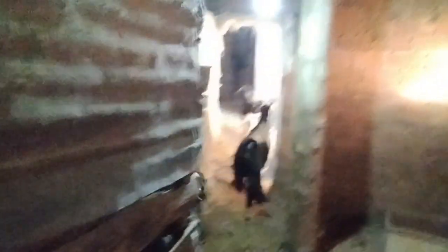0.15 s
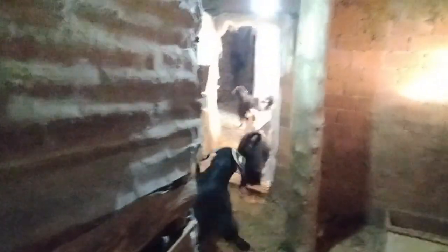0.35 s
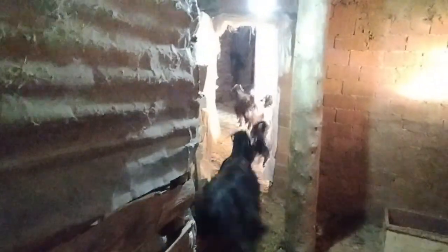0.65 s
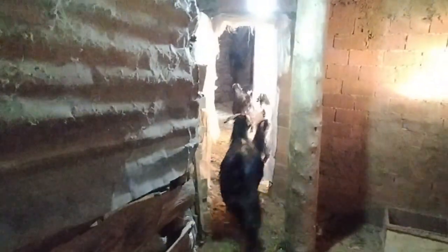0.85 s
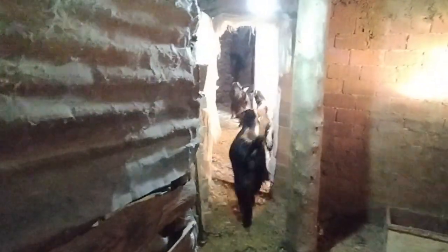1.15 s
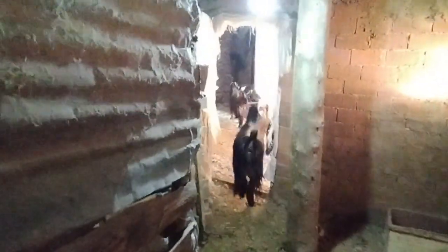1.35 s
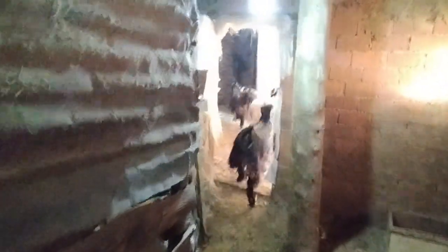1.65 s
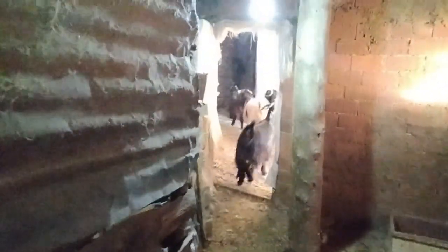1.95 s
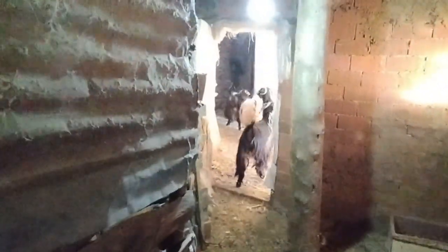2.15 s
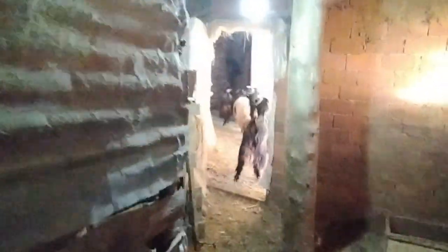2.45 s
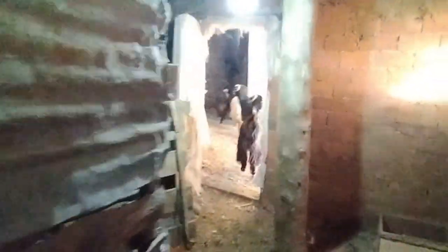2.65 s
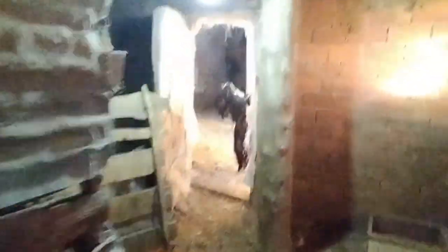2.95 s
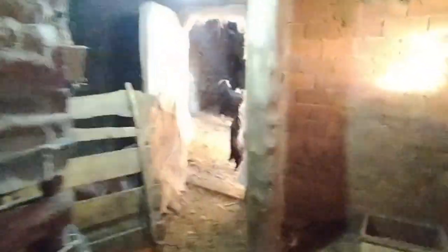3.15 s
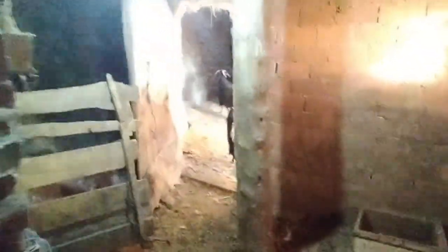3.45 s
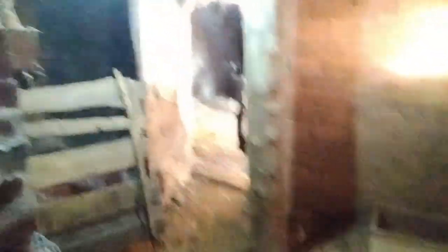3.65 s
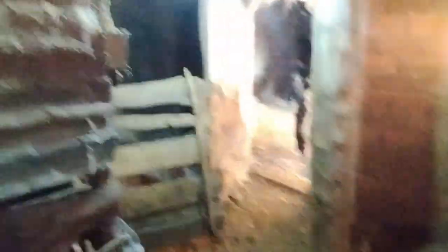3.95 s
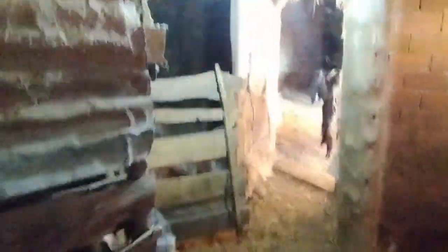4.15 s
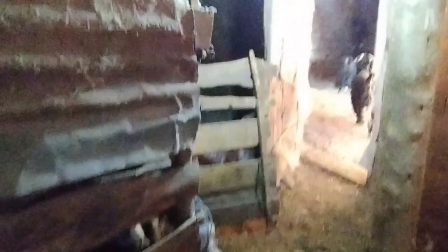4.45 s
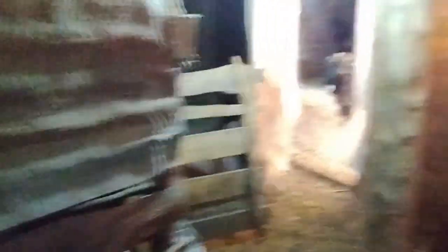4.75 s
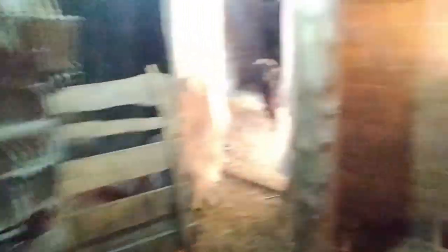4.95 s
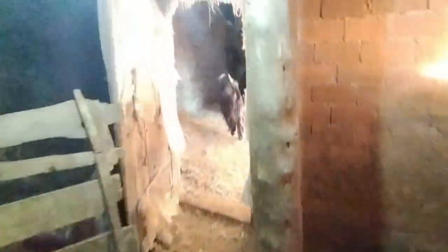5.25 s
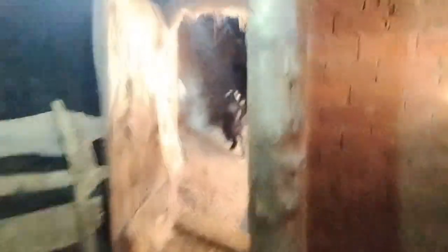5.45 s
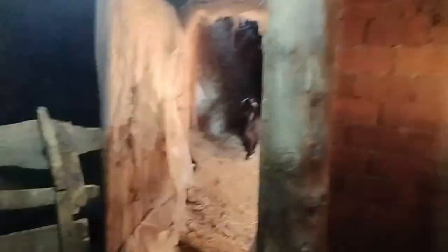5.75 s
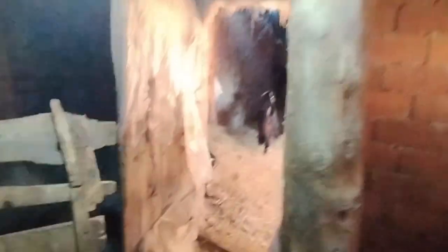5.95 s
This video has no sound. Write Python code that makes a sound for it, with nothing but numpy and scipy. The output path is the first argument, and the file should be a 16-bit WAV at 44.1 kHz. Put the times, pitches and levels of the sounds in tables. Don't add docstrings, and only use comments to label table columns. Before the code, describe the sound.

Loud tinny sheet-metal rattle with a boomy shove, a softer second bump, then sparse dull hoof and shoe thuds on straw in a quiet barn.

```python
import sys
import numpy as np
from scipy import signal
from scipy.fft import rfft, irfft, next_fast_len
from scipy.io import wavfile
from scipy.ndimage import uniform_filter1d, map_coordinates

SR = 44100
rng = np.random.default_rng(int(sys.argv[2]) if len(sys.argv) > 2 else 0)


def materialize(psi):
    bounded = np.clip(np.atleast_2d(psi).T, -1, 1)
    quanta = np.round(bounded * 32767).astype(np.int16)
    wavfile.write(sys.argv[1], SR, quanta)


def makeup_ratio(level_db):
    decades = np.asarray(level_db, float) / 20
    return 10 ** decades


N = 269451

# frequency in Hz, density in dB per Hz.
STRAW = [(290, -0.5), (500, -8.5), (688, -5), (1130, -11.5), (1440, -10.5), (1720, -13.5), (2070, -11.5),
         (6510, -14), (8580, -26), (9920, -41.5), (12000, -44), (13300, -69), (16000, -34)]


def evened(x):
    return x / np.sqrt(np.mean(x ** 2) + 1e-20)


def curve(rows):
    s, *columns = np.transpose(rows)
    return [np.interp(np.arange(N) / SR, s, c) for c in columns]


def read(points, hz):
    f, value = np.transpose(points)
    return np.interp(np.log(hz + 1), np.log(f + 1), value)


def colour(x, points):
    size = next_fast_len(x.shape[-1])
    gain = makeup_ratio(read(points, np.fft.rfftfreq(size, 1 / SR)))
    return irfft(rfft(x, size) * gain, size)[..., :x.shape[-1]]


def resonate(x, hz, width_hz):
    r = np.exp(-np.pi * width_hz / SR)
    turn = 2 * np.pi * hz / SR
    return signal.lfilter([1 - r], [1, -2 * r * np.cos(turn), r * r], x) * np.sin(turn) * 2


def grains(per_s, spread_db):
    u, e, sign = rng.random((3, N))
    size = makeup_ratio(spread_db * np.minimum(-np.log(e + 1e-9), 4))
    return evened((u < per_s / SR) * size * (sign - .5))


def blow(s, db, hold, t60, drive, rise):
    at = round(s * SR)
    piece = drive[at:at + round((hold + t60) * SR) + 1]
    t = np.arange(len(piece)) / SR
    fade = makeup_ratio(db - 60 * np.maximum(t - hold, 0) / t60)
    return at, piece, fade * (1 - np.exp(-t / rise))


def held(rows, share, *rest):
    return [(s, db, hz, share * t60, t60, *rest) for s, db, hz, t60 in rows]


def rings(rows, drive, raw_db, rise):
    out = np.zeros(N)
    for s, db, hz, hold, t60, width_hz in rows:
        at, piece, shape = blow(s, db, hold, t60, drive, rise)
        mode = resonate(resonate(piece, hz, width_hz), hz, 2 * width_hz)
        out[at:at + len(piece)] += shape * (evened(mode) + makeup_ratio(raw_db) * piece)
    return out


def air():
    # frequency in Hz, density in dB per Hz.
    air_bands = [(12, -9), (20, 5), (182, -26), (698, -20), (1030, -29), (1960, -20.5), (2910, -28.5),
                 (6010, -24), (8410, -29.5), (9670, -51), (11100, -44.5), (14300, -57), (16000, -35)]
    # frequency in Hz, left-right likeness from -1 to 1.
    likeness = [(60, 0.18), (240, 1), (950, 0.43), (3770, -0.22), (15000, 0.016)]
    # time in seconds, level in dB.
    stir_level = [(0.0, -21.5), (0.19, -32), (0.59, -43), (1.04, -53), (1.24, -71), (1.38, -49.5),
                  (1.6, -56.5), (2.13, -64.5), (3.47, -57.5), (3.81, -48), (3.91, -53), (5.82, -60),
                  (6.11, -57)]
    z = rfft(rng.standard_normal((2, N)))
    same = np.clip(read(likeness, np.fft.rfftfreq(N, 1 / SR)), -1, 1)
    hush = irfft([z[0], same * z[0] + np.sqrt(1 - same ** 2) * z[1]], N)

    stir = colour(np.array([grains(9800, 3.4), grains(9000, 3.2)]), STRAW)
    fits = evened(colour(rng.standard_normal(N), [(1, -85.0), (6, 8.0), (25, 6.0), (80, -46)]))
    stir = stir * makeup_ratio(1.84 * fits)
    return makeup_ratio(-61) * evened(colour(hush, air_bands)) + makeup_ratio(curve(stir_level)[0] - 4.0) * evened(stir)


def gate():
    # frequency in Hz, density in dB per Hz.
    rumble_bands = [(11, -25), (18, 11), (33, -2.5), (54, -3), (108, -7), (140, -8.5), (170, -33.5),
                    (220, -82), (370, -120)]
    # start in seconds, level in dB, t60 in seconds.
    jolts = [
        (0, -21, 0.81),
        (.06, -19.5, 2.9),
        (1.31, -24, 1.8),
        (3.6, -50, 1.3),
        (3.92, -50, 0.81),
        (4.42, -66, 1.2),
        (5.34, -46.5, 1),
        (6.05, -59, .5),
    ]
    # frequency in Hz, level in dB, width in Hz, t60 in seconds.
    sheet_modes = [(191, -33, 105, 0.37), (276, -39.5, 24, 0.72), (398.6, -41, 10.3, 0.92),
                   (473.4, -48, 16, 1), (703, -40.5, 78, 0.63), (758.7, -39.5, 13.4, 0.96),
                   (847, -38.5, 33, 0.99), (989, -44, 62, 0.64)]
    # start in seconds, level in dB, frequency in Hz,
    # hold in seconds.
    hums = [(0.78, -56, 680, 0.21), (0.84, -54.5, 269, 0.27), (1.285, -36, 122, 0.033),
            (1.266, -36, 298, 0.047), (1.26, -50, 710, 0.071), (1.46, -46.5, 290, 0.022),
            (2.7, -62, 264, 0.045), (.52, -53.5, 720, .3)]
    # start in seconds, level in dB,
    # frequency in Hz, hold in seconds.
    rubs = [(0.3, -47, 217, 0.4), (0.4, -48, 590, 0.27), (0.454, -44.5, 314, 0.22), (.75, -60, 840, 0.29),
            (2, -66.5, 305, 0.45), (1.7, -50.5, 670, 0.025), (3, -54.5, 600, 0.078), (1.7, -50, 89, .2),
            (2.024, -54, 119, .25), (0, -37.5, 296, .06), (0, -39, 790, 0.054)]
    shove_s, shove_hold_s = 0.039, 0.34
    hum_t60_s, hum_width_hz = 0.59, 24
    rub_fade, rub_spread = 2.35, 0.47

    ground = evened(colour(grains(400, 3.0), rumble_bands))
    shake = np.full(N, makeup_ratio(-58.5))
    for s, db, t60 in jolts:
        at, piece, shape = blow(s, db, 0, t60, ground, 0.014)
        shake[at:at + len(piece)] += shape

    rows = [(shove_s, db, hz, shove_hold_s, t60, width_hz) for hz, db, width_hz, t60 in sheet_modes]
    rows += [(*row, hum_t60_s, hum_width_hz) for row in hums]
    rows += [(s, db, hz, hold, rub_fade * hold, rub_spread * hz) for s, db, hz, hold in rubs]
    return makeup_ratio(-5.0) * shake * ground + rings(rows, grains(900, 2.7), -92.0, 0.0029)


def small_parts():
    # start in seconds, peak in dB, frequency in Hz,
    # hold in seconds, width in Hz.
    jingles = [
        (.001, -34, 4270, 0.24, 463),
        (2.847, -48, 1480, 0.029, 1400),
        (6.048, -38.5, 2000, 0.029, 700),
    ]
    # start in seconds, peak in dB, frequency in Hz, t60 in seconds.
    clinks = [
        (.0044, -21, 4190, 0.064),
        (.16, -30, 4120, 0.055),
        (.269, -25, 4600, 0.12),
    ]
    # start in seconds, peak in dB, frequency in Hz, t60 in seconds.
    ticks = [(3.605, -47, 2130, 0.03), (5.535, -58, 1400, .05), (3.768, -43, 2030, 0.19),
             (3.735, -52, 2050, 0.11), (4.5294, -54, 1970, 0.044), (5.7, -61, 1900, 0.095),
             (6.057, -27.5, 1650, 0.038)]
    hold_share, jingle_fade = 0.18, 2.4
    clink_width_hz, tick_width_hz = 150, 200
    rows = held(clinks, hold_share, clink_width_hz) + held(ticks, hold_share, tick_width_hz)
    rows += [(s, db, hz, hold, jingle_fade * hold, width_hz) for s, db, hz, hold, width_hz in jingles]
    return rings(rows, grains(9000, 0.59), -72.0, 0.00033)


def knocks():
    # start in seconds, peak in dB, frequency in Hz, t60 in seconds,
    # overtone in dB. First come clicks of small metal parts.
    metal_clicks = [(.003, -16.5, 4370, 0.022, -20), (.026, -21.5, 4040, .02, -20),
                    (.084, -28, 4300, .02, -10), (.09, -18, 1990, .015, -10), (.163, -27, 4290, .03, -20),
                    (.184, -10.5, 2880, .012, -22), (.209, -27, 2130, .015, -10),
                    (0.259, -22, 2780, .012, -10), (0.302, -30, 4400, .025, -20),
                    (0.345, -23, 2860, .02, -17), (.487, -33, 3830, .012, -10),
                    (1.6392, -44.5, 1980, .018, -12), (1.689, -46.5, 4320, 0.006, -4),
                    (1.763, -43, 2210, 0.019, -13), (1.896, -51, 3140, .012, -8),
                    (1.978, -54, 2940, .018, -10), (2.2272, -41, 2100, 0.016, -16),
                    (2.337, -57, 3530, .015, -10), (2.347, -51, 3660, 0.022, -10),
                    (4.704, -58, 3800, .012, -6), (4.921, -56, 3100, .015, -6),
                    (5.102, -54, 4420, .018, -10), (5.119, -60, 2300, .015, -10)]
    flaps = [
        (0.078, -20, 25, .4, -16),
        (.2, -29, 21.2, 1.1, -6),
        (1.25, -35, 21, .4, -10),
        (1.33, -18, 23.58, 1.28, -16),
        (2.098, -38.5, 20.89, 2.8, -26),
        (5.78, -49.5, 40.5, 0.63, -10),
    ]
    wood_knocks = [(1.135, -31, 176.6, 0.14, -37), (1.229, -37, 694, 0.073, -12),
                   (1.283, -34, 674, 0.056, -2), (2.2279, -47.5, 516, 0.031, 6.5),
                   (2.2283, -52, 1400, 0.011, -9), (2.713, -34.5, 208, 0.0098, -17),
                   (3.6285, -25.5, 311, 0.04, -12.5), (3.952, -24.5, 346, 0.055, 1.5),
                   (4.4153, -29, 365, 0.03, 6), (4.4168, -31, 244.6, 0.16, -27),
                   (5.36, -26.5, 237, 0.076, 4.5)]
    # start in seconds, peak in dB, frequency in Hz,
    # t60 in seconds.
    single_blows = [(.019, -20, 215, 0.048), (0.079, -16, 184, 0.059), (.108, -15, 308, 0.045),
                    (0.129, -16, 184.5, 0.21), (0.137, -24, 191, 0.12), (.192, -18.5, 172, .05),
                    (.223, -21.5, 306, .04), (0.241, -21.5, 110, 0.083), (0.379, -29, 403, .05),
                    (0.405, -29, 209, .05), (.451, -30, 226, 0.04), (0.527, -30.5, 183, 0.057),
                    (0.663, -37, 204, .05), (.712, -38, 208, 0.056), (1.317, -22, 120.6, .14),
                    (1.346, -28, 138, 0.054), (1.409, -34, 242, 0.046), (1.437, -31, 172, .05),
                    (1.519, -38, 294, 0.068), (2.847, -42.5, 726, 0.033), (2.864, -54, 317, .04),
                    (2.89, -54, 242, .04), (2.918, -51, 382, .04), (2.992, -56, 516, .03),
                    (3.081, -57, 807, .03), (3.108, -40, 363, .03), (3.114, -41, 556, 0.046),
                    (3.147, -46, 150, 0.062), (3.591, -37, 250, .05), (3.605, -36, 349, 0.046),
                    (3.649, -28, 221, 0.042), (3.664, -32.5, 312, .05), (3.679, -39, 328, .04),
                    (3.899, -38, 339, .04), (3.908, -44, 358, .04), (3.931, -28.5, 308, 0.045),
                    (4.172, -48, 220, .03), (4.188, -46, 290, 0.042), (4.247, -53, 344, .04),
                    (4.43, -35, 265, 0.04), (4.47, -40, 285, .05), (4.507, -47, 290, .05),
                    (4.698, -52, 253, 0.044), (5.353, -42, 328, .03), (5.529, -46, 336, 0.053),
                    (6.052, -28, 452, .03), (6.057, -35, 403, .03), (6.064, -29, 479, 0.033),
                    (6.066, -33.5, 1040, 0.046), (6.038, -47, 900, 0.034), (6.077, -36, 452, .04)]
    flap_over, wood_over, click_over = 1.1, 1.98, 0.88
    rows = [(*row, flap_over) for row in flaps]
    rows += [(*row, wood_over) for row in wood_knocks]
    rows += [(*row, click_over) for row in metal_clicks]
    rows += [(*row, -9.5, wood_over) for row in single_blows]

    out, t = np.zeros(N + 2 * SR), np.arange(2 * SR) / SR
    for s, db, hz, t60, over_db, ratio in rows:
        over_hz = ratio * hz
        top_hz = max(hz, over_hz)
        lower = makeup_ratio(-60 * t / t60) * np.sin(2 * np.pi * hz * t)
        upper = makeup_ratio(over_db - 60 * t / (0.26 * t60)) * np.sin(2 * np.pi * over_hz * t)
        crack = 0.12 * np.exp(-1.5 * t * top_hz) * np.sin(2 * np.pi * 0.42 * top_hz * t)
        give = 1 - np.exp(-6. * t * top_hz)
        out[round(s * SR):][:len(t)] += give * makeup_ratio(db) * (lower + upper + crack)
    return out[:N]


def scrapes():
    # frequency in Hz, density in dB per Hz.
    clash_bands = [(530, -32), (900, 2.5), (2830, 1), (3550, -1.5), (4460, 2.5), (8050, -7.5),
                   (9650, -32.5), (12300, -33), (13700, -92), (15100, -42), (16000, -36)]
    # frequency in Hz, density in dB per Hz.
    edge_bands = [(530, -36), (900, 1), (1570, -6), (3820, -2.5), (5220, -8), (6250, -3), (8760, -10),
                  (9880, -24), (11400, -21), (12700, -30), (13500, -57), (14400, -14), (16000, -21)]
    # start in seconds, peak in dB, stressed Hz, t60 in seconds.
    clatter = [(.0044, -34, 4330, 0.069), (.0364, -28.5, 3900, 0.054), (.077, -25.5, 3650, 0.14),
               (.102, -26, 1620, 0.11), (.1215, -26.5, 2800, 0.28), (.177, -24.5, 3340, 0.22),
               (.2084, -37, 2110, 0.26), (.2604, -30, 4900, 0.17), (.312, -36, 4670, 0.49),
               (.363, -21.5, 2710, 0.029), (.406, -50, 2840, 0.12), (.4645, -32.5, 7160, 0.074),
               (.481, -39, 6650, 0.11), (.6025, -46.5, 6200, 0.074), (.6175, -36, 6500, 0.088),
               (.652, -60, 7140, .13), (.839, -39.5, 6240, 0.048), (1.1814, -48, 7140, 0.14),
               (1.2277, -36, 3900, 0.28), (1.281, -38, 1718, 0.21), (1.31, -38, 1550, 0.082)]
    # start in seconds, peak in dB, stressed Hz.
    single_snaps = [(0.3452, -36, 2400), (0.68, -39, 3200), (0.082, -34, 3700), (0.2701, -26, 5400),
                    (0.96, -55, 3600), (1.15, -49, 7400), (1.62, -46.5, 5700), (1.98, -69, 3040),
                    (1.8, -49, 6500), (2.1, -44.5, 1500), (2.389, -57, 7300), (1.3, -42, 1530),
                    (1.2285, -38, 3000), (3.627, -40, 1200), (2.82, -58, 1520), (2.8453, -52, 1510),
                    (4.172, -47.5, 2800), (.128, -27.5, 6800), (.104, -32, 5000), (.229, -36, 3400),
                    (.3575, -32, 7400)]
    # start in seconds, length in seconds, level in dB,
    # stressed Hz, lowest Hz.
    swishes = [(1.417, 0.14, -52, 6800, 710), (1.861, 0.044, -50.5, 6800, 570),
               (3.34, 0.22, -67.5, 7000, 1800), (3.721, 0.095, -58, 4000, 1500),
               (3.765, 0.077, -56.5, 5200, 3100), (5.2, 0.13, -68, 7200, 2000),
               (2.4, 0.19, -76, 6500, 2900), (4.38, 0.17, -60, 2400, 660), (4.51, 0.22, -70, 8300, 2470),
               (0.82, 0.085, -61.5, 3190, 1300)]
    # start in seconds, peak in dB, stressed Hz, t60 in seconds.
    scuffs = [(1.6874, -55, 4060, 0.46), (1.812, -52, 6450, 0.17), (2.3439, -49.5, 3920, 0.045),
              (2.818, -66, 1900, 0.11), (2.847, -52, 1580, 0.61), (2.993, -55, 1790, 0.53),
              (3.094, -52, 1580, 0.14), (3.585, -41, 2430, 0.21), (3.637, -41, 1930, 0.2),
              (3.779, -47, 5700, 0.075), (3.89, -43.5, 1600, 0.2), (3.934, -40, 1510, 0.12),
              (4.476, -47.5, 2900, 0.1), (4.918, -56, 3280, 0.055), (5.1003, -60, 2340, 0.13),
              (5.322, -48, 1920, 0.23), (5.354, -43.5, 1890, 0.27), (5.491, -53.5, 1920, 0.18),
              (5.8594, -58, 5500, 0.32), (6.035, -44.5, 1590, 0.066), (6.058, -47, 1530, 0.21)]
    hold_share, snap_t60_s = 0.15, 0.017
    snaps, out = grains(6500, 4.85), np.zeros(N)
    snaps[[round((row[0] + 0.00088) * SR) for row in single_snaps]] = 9.8
    stage = np.digitize(np.arange(N) / SR, [.45, 1.1])
    drive = np.choose(stage, [evened(colour(snaps, points)) for points in (clash_bands, edge_bands, STRAW)])

    snap_rows = [(*row, snap_t60_s) for row in single_snaps]
    for rows, rise, trim_db in ((clatter + scuffs, .002, -11.), (snap_rows, .0004, -9.)):
        for s, db, hz, hold, t60 in held(rows, hold_share):
            at, piece, shape = blow(s, db + trim_db, hold, t60, drive, rise)
            out[at:at + len(piece)] += shape * (piece + 0.66 * evened(resonate(piece, hz, 1750)))

    for s, length, db, hz, low_hz in swishes:
        piece = drive[round(s * SR):][:round(length * SR)]
        piece = piece + 0.36 * evened(resonate(piece, hz, 2100))
        piece = signal.sosfilt(signal.butter(3, low_hz, "high", fs=SR, output="sos"), piece)
        swell = np.sin(np.pi * np.linspace(0, 1, len(piece))) ** 0.33
        out[round(s * SR):][:len(piece)] += makeup_ratio(db) * swell * evened(piece)
    return out * makeup_ratio([[-1.5], [1.5]])


def thuds():
    # start in seconds, peak in dB, frequency in Hz, t60 in seconds.
    post_bumps = [(.076, -14.5, 210, 0.15), (.103, -16, 266, 0.091), (.128, -17, 196, 0.23),
                  (.197, -22, 273, 0.43), (.238, -24, 112, 0.15), (.275, -25, 206, 0.39),
                  (.838, -37.5, 320, 0.2), (1.282, -32, 323, 0.059), (1.322, -31, 272, 0.34),
                  (1.5, -37.5, 388, 0.13)]
    # start in seconds, peak in dB, frequency in Hz, t60 in seconds.
    foot_thuds = [(2.439, -52, 390, 0.082), (2.818, -47.5, 620, 0.13), (2.846, -42, 313, 0.29),
                  (2.935, -49, 328, 0.23), (2.979, -45.5, 520, 0.14), (3.087, -47.5, 410, 0.29),
                  (3.06, -48, 135, 0.28), (3.108, -77, 586, .16), (3.377, -53, 408, 0.16),
                  (3.453, -54, 506, 0.097), (3.588, -34, 330, 0.16), (3.624, -31.5, 263, 0.22),
                  (3.647, -38, 292, 0.13), (3.668, -54, 270, .1), (3.896, -33, 375, 0.24),
                  (3.93, -27, 330, 0.13), (4.09, -46, 366, 0.14), (4.09, -61, 720, .12),
                  (4.81, -57, 260, .1), (4.182, -45.5, 279, 0.25), (4.429, -38, 150, 0.27),
                  (4.498, -47, 260, 0.35), (4.692, -48.5, 290, 0.11), (5.327, -41, 300, 0.14),
                  (5.361, -30.5, 340, 0.11), (5.432, -47, 680, 0.08), (5.516, -47.5, 320, 0.15),
                  (6.043, -32, 298, 0.11), (6.0515, -30, 330, 0.1), (6.063, -27, 596, 0.12),
                  (6.078, -34, 457, .14)]
    dull = [(60, -27.5), (180, -4.5), (600, 1.5), (1500, -9.5), (3000, -33.0), (9000, -67.5)]
    earth = evened(colour(grains(2500, 2.6), dull))
    return rings(held(post_bumps + foot_thuds, 0.1, 145), earth, -6.0, 0.0013)


def squeaks():
    # start in seconds, length in seconds, level in dB, first Hz, last Hz.
    slips = [
        (1.68, 0.1, -63.5, 2400, 2030),
        (4.7, 0.058, -68.5, 1920, 1890),
        (4.3, .1, -72, 2200, 2100),
        (3.11, 0.048, -63, 1620, 1560),
    ]
    width_hz = 90
    out = np.zeros(N)
    for s, length, db, first_hz, last_hz in slips:
        t = np.arange(0, length, 1 / SR)
        flutter = uniform_filter1d(rng.standard_normal((2, SR // 2)), round(SR / width_hz / 2))
        a, b = flutter[:, :len(t)]
        turn = 2 * np.pi * np.cumsum(np.linspace(first_hz, last_hz, len(t))) / SR
        tone = evened((1.5 + evened(a)) * np.cos(turn) + evened(b) * np.sin(turn))
        out[round(s * SR):][:len(t)] += makeup_ratio(db) * np.sqrt(np.sin(np.pi * t / length)) * tone
    return out


def barn(x):
    # frequency in Hz, t60 in seconds.
    room_decay = [(100, 0.055), (500, 0.28), (2000, 0.093), (8000, 0.064)]
    taps = np.zeros((2, SR // 2))
    slots = np.arange(100, SR // 2 - 20, 20)
    at = slots + rng.integers(0, 20, (2, len(slots)))
    np.put_along_axis(taps, at, rng.choice([-1., 1.], at.shape), 1)
    hz, t, z = signal.stft(taps, SR, nperseg=256)
    tail = signal.istft(z * makeup_ratio(-60 * t / read(room_decay, hz)[:, None]), SR, nperseg=256)[1]
    return signal.fftconvolve(x[None], tail / np.linalg.norm(tail[0]), axes=1)[:, :N]


def scene():
    # time in seconds, left ear lead in ms.
    ear_lead = [(1., .49), (1.2, .1), (3., 0.)]
    sharp = knocks()
    low = makeup_ratio(-9.5) * thuds() + makeup_ratio(-8.5) * small_parts() + squeaks() + gate() + sharp
    low = low * makeup_ratio([[.6], [-.3]])
    high = scrapes()

    lead, at = curve(ear_lead)[0] * SR / 2000, np.arange(N)
    direct = np.zeros((2, N))
    for part, share in ((low, .45), (high, 1)):
        for k, sign in enumerate((1, -1)):
            direct[k] += map_coordinates(part[k], [at + sign * share * lead], order=3, mode="nearest")

    to_room = (0.61 * low + high).mean(0) - 0.49 * (1 - makeup_ratio(-5)) * sharp
    upper = colour(to_room, [(100, -14.0), (600, -13.5), (1500, -3.0), (16000, 8.0)])
    return direct + barn(upper) + air()


def low_pass(x):
    return signal.sosfilt(signal.butter(12, 17060, fs=SR, output="sos"), x)


def record(dry):
    # frequency in Hz, left minus right in dB.
    case_shade = [(130, -0.5), (600, -.4), (1300, -3), (2500, -4), (4200, -4), (8000, -8.5), (10500, 2)]
    # frequency in Hz, gain in dB.
    mic_response = [(8600, -2.5), (9200, 1.5), (9450, -8), (10100, -32), (10500, 4), (12400, 0),
                    (12900, -26), (14700, -21), (15300, 7.5), (15800, 1), (15950, -57)]
    shaded = [colour(x, [(hz, side * db) for hz, db in case_shade]) for x, side in zip(dry, (.5, -.5))]
    return low_pass(colour(np.array(shaded), mic_response))


dry = scene()
out = record(dry)
materialize(out)
```